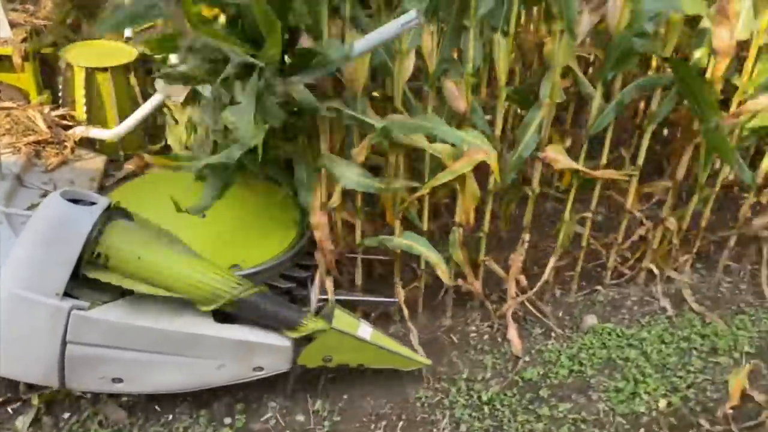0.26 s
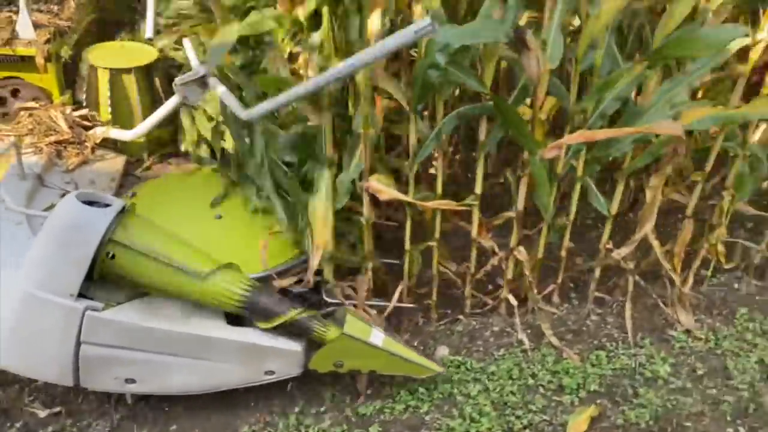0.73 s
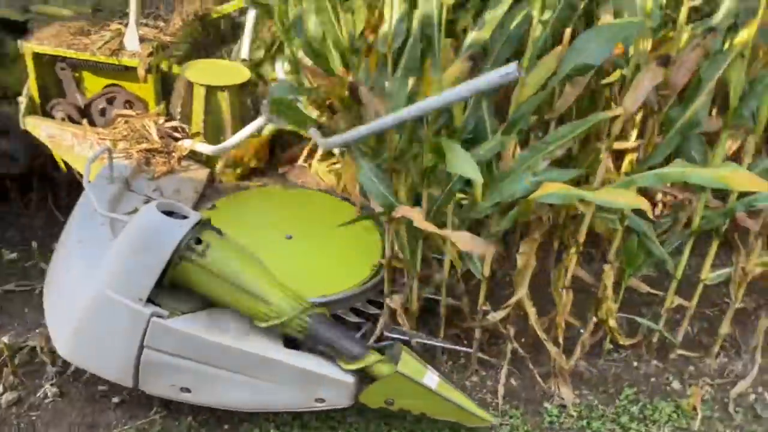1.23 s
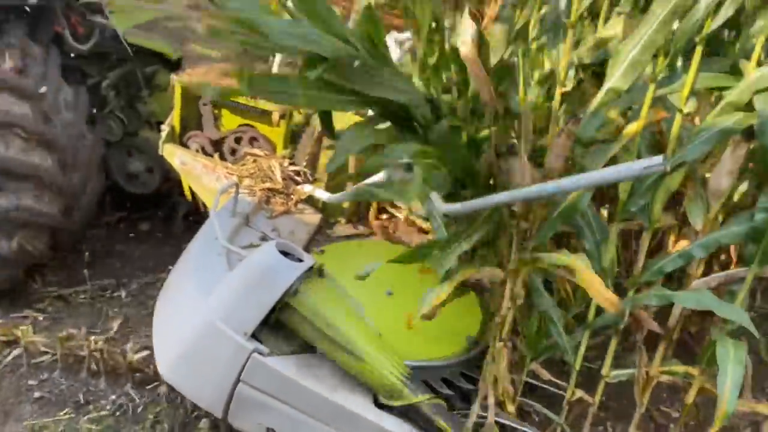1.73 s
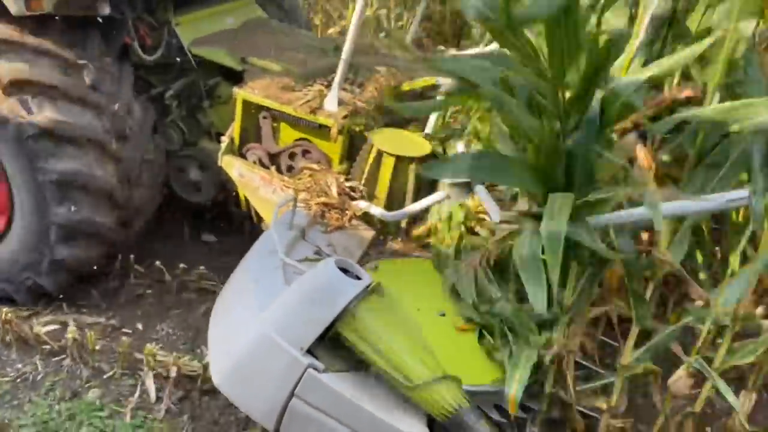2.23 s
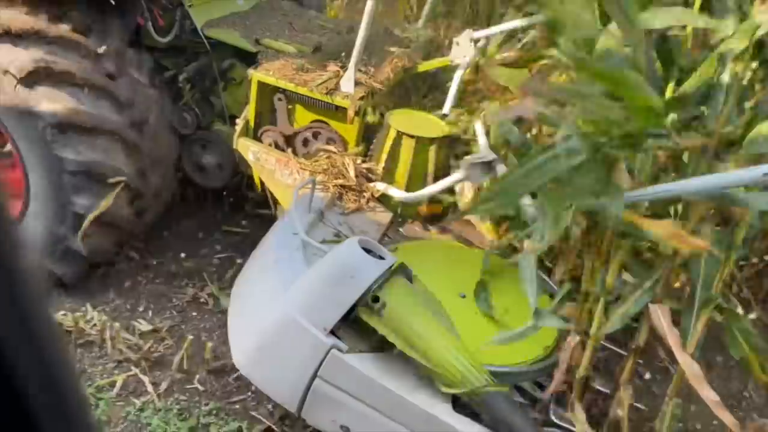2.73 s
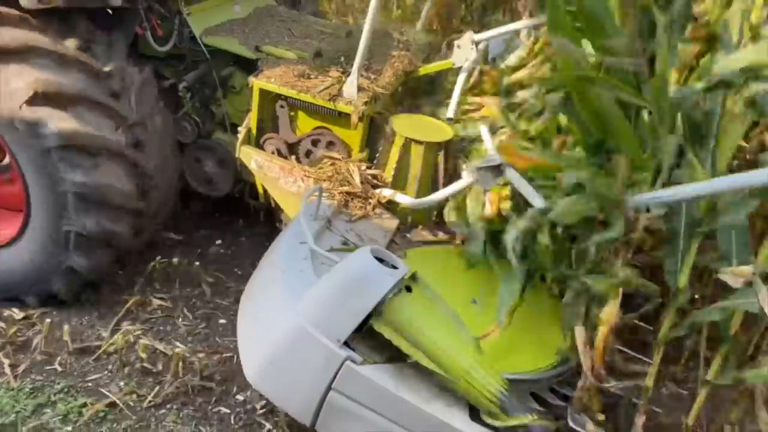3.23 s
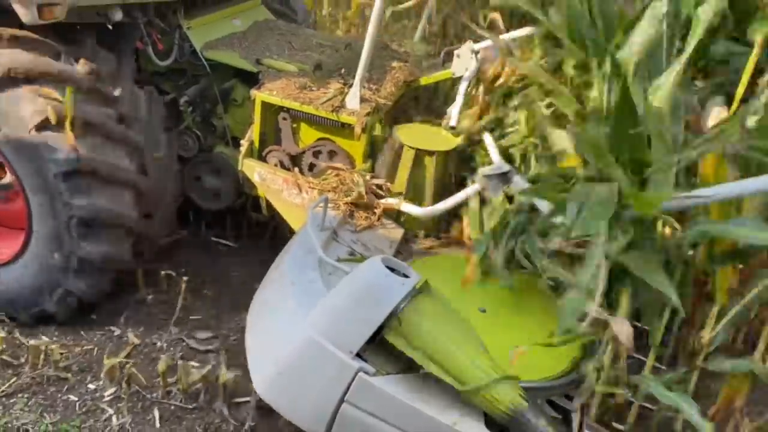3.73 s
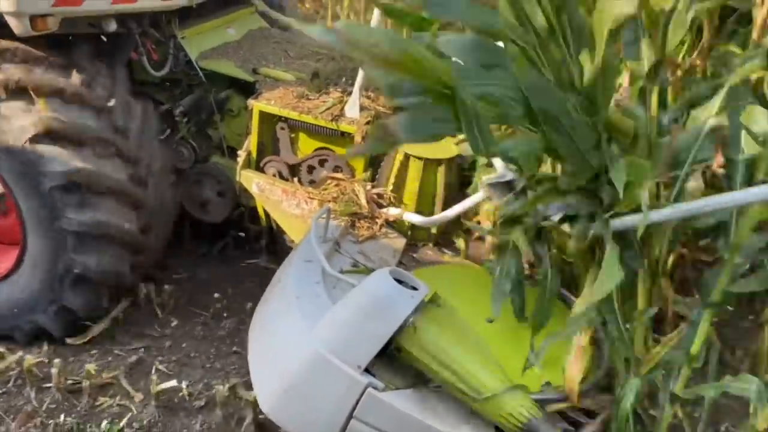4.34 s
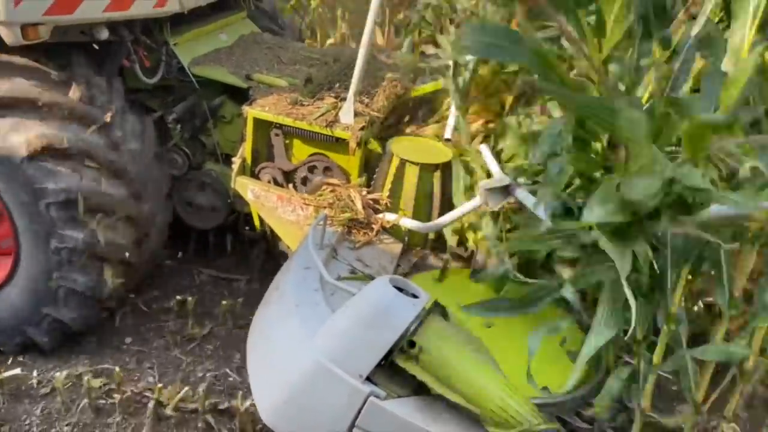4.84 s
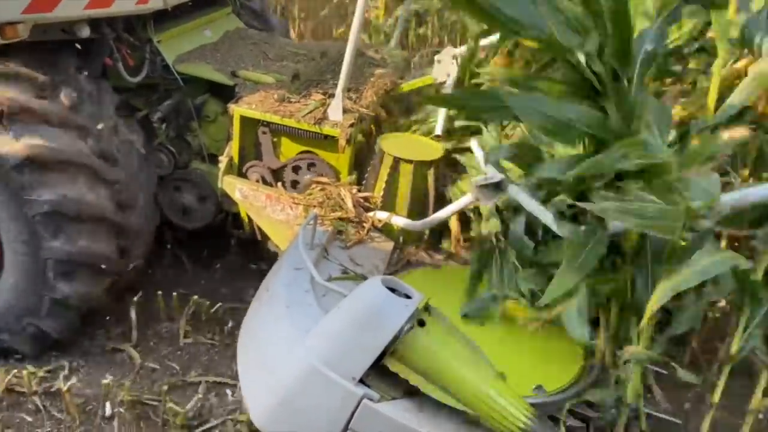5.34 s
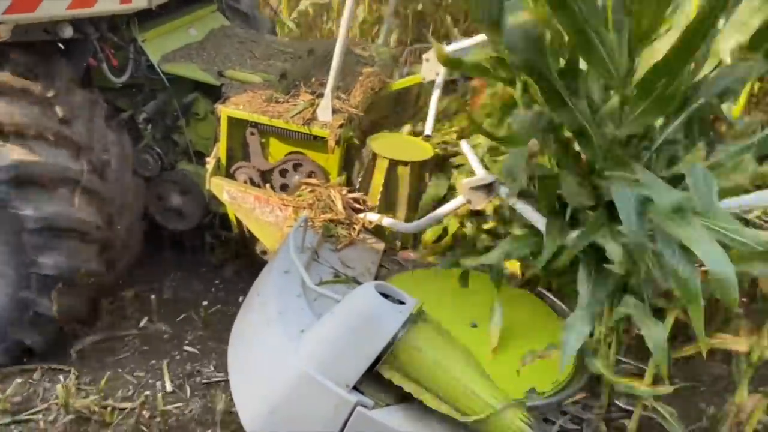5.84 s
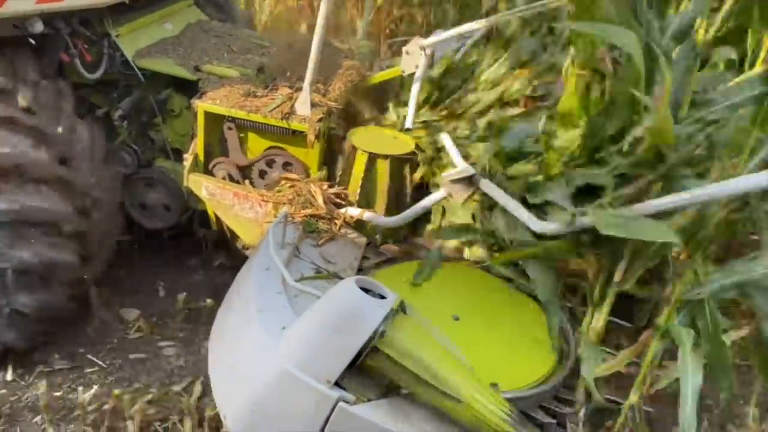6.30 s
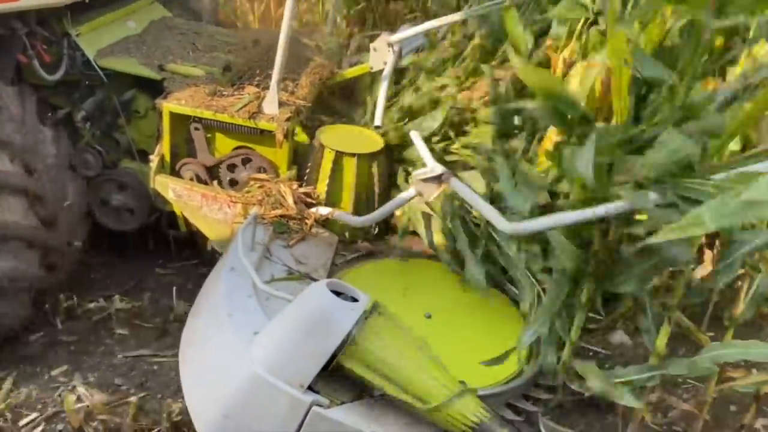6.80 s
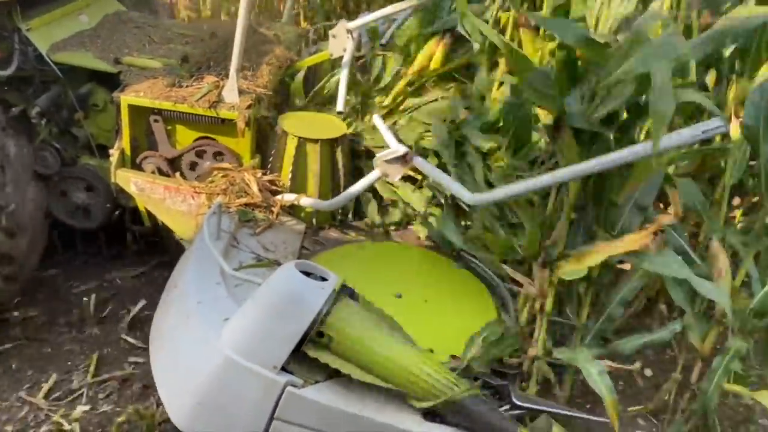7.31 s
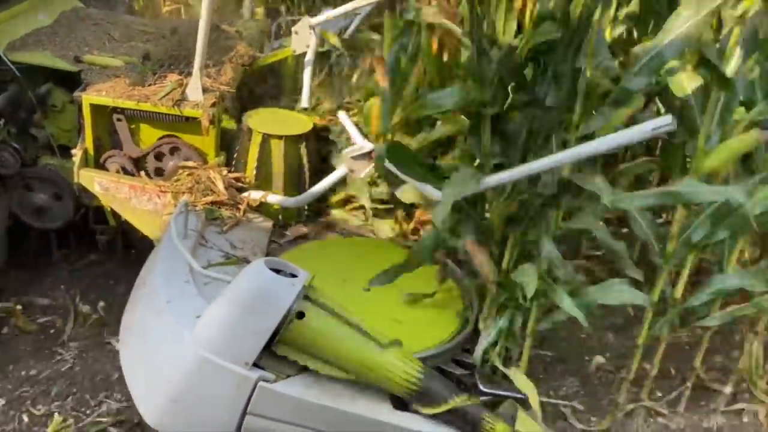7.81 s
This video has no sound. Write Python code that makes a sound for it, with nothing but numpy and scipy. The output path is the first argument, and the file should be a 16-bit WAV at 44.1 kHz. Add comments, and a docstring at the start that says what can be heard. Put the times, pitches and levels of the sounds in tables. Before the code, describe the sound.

Continuous harvester noise heard in stereo from a vehicle alongside: deep engine throb, rough harmonic drum hum, broad body roar and gritty hiss of chopped corn. Leaves tear and rustle, fine snaps crackle everywhere, and larger cobs pop against sheet metal. Engine speed climbs gently from about two seconds. The drum races briefly twice, with a cluster of crunches near 5.6 seconds, then drones lower to the end.

```python
"""In a standing corn field, heard from a tractor driving alongside a forage harvester, by a microphone pair.
From the start the knife drum and six-cylinder engine drone as harmonics; shaped noise is roar, chop and hiss.
Leaves rustle, stalks splinter and cobs crack as short ringing bursts; bunches crunch in the feed rollers.
From about 2 s the engine gains speed; near 3.6 and 5.4 s the drum races briefly, then runs slower from 6 s."""
import sys
import numpy as np
from scipy import signal
from scipy.fft import rfft, irfft, next_fast_len
from scipy.io import wavfile
from scipy.ndimage import uniform_filter1d, map_coordinates

SR = 44100
rng = np.random.default_rng(int(sys.argv[2]) if len(sys.argv) > 2 else 0)


def pcm_store(signal):
    """Save signal as 16-bit PCM."""
    levels = np.round(np.clip(np.atleast_2d(signal), -1, 1) * 32767)
    wavfile.write(sys.argv[1], SR, levels.astype(np.int16).T)


N = 355443


def amp(db):
    """Decibels to gain."""
    return 10 ** (np.asarray(db) / 20)


def unit(x):
    """Scale to rms 1."""
    return x / np.sqrt(np.mean(x ** 2) + 1e-20)


def along(points, hz):
    """Read (frequency, value) points on a log frequency axis."""
    f, v = np.transpose(points)
    return np.interp(np.log(hz + 1), np.log(f + 1), v)


def curves(rows):
    """One value per sample for each column after the time."""
    s, *cols = np.transpose(rows)
    return [np.interp(np.arange(N) / SR, s, c) for c in cols]


def wobble(rate):
    """A smooth random curve through `rate` knots a second."""
    knots = rng.standard_normal(4096)
    return map_coordinates(knots, [np.arange(N) * rate / SR], mode="wrap")


def hump(x, centre, width):
    """A bell-shaped band, 1 at its centre; width is its standard deviation."""
    return np.exp(-.5 * ((x - centre) / width) ** 2)


def filtered(x, response):
    """Multiply the spectrum of x by a response of frequency."""
    m = next_fast_len(N + SR // 2)
    return irfft(rfft(x, m) * response(np.fft.rfftfreq(m, 1 / SR)), m)[..., :N]


def panned(x, left_db):
    """Make the left microphone louder than the right by left_db."""
    return x * amp(np.array([[left_db], [-left_db]]) / 2)


def patchy(depth_db):
    """Two noises with shared patches of random gain in time and frequency."""
    z = signal.stft(rng.standard_normal((2, N)), nperseg=512)[2]
    field = rng.standard_normal(z.shape[1:])
    field = uniform_filter1d(field, size=4, axis=0)
    field = uniform_filter1d(field, size=8, axis=1)
    return signal.istft(z * amp(depth_db * unit(field)), nperseg=512)[1][:, :N]


def snaps(per_second, scatter_db, life):
    """Tiny fractures at random times, each a noise burst whose power decays over `life` seconds."""
    hit = rng.random(N) < per_second / SR
    size = amp(scatter_db * np.clip(rng.standard_normal(N), -2, 2))
    power = signal.lfilter([1], [1, -np.exp(-1 / (abs(life) * SR))], hit * size ** 2)
    return unit(np.sqrt(np.abs(power)) * rng.standard_normal((2, N)))


def tone(angle, db, flutter_db, flutter_rate):
    """One harmonic whose strength flutters; it dips further than it swells."""
    swell = unit(amp(flutter_db * np.minimum(wobble(flutter_rate), 1)))
    return np.sqrt(2) * amp(db) * swell * np.sin(angle + 2 * np.pi * rng.random())


# likeness of a wide source at the microphone pair: (frequency [Hz], left-right correlation [0-1])
PAIR_LIKENESS = [(60, .99), (300, .97), (700, .75), (1100, .62), (1600, .3), (2300, .25), (2900, .4),
                 (3600, .3), (4500, .55), (6500, .7), (9000, .9), (15000, .85)]


def spread(pair, spectrum):
    """Colour two unrelated signals and mix them as a wide source reaches the microphone pair."""
    def mix(hz):
        turn = np.arccos(np.clip(along(PAIR_LIKENESS, hz), -1, 1)) / 2
        return amp(along(spectrum, hz)) * np.array([np.cos(turn), np.sin(turn)])
    mid, side = filtered(pair, mix)
    return unit(np.array([mid + side, mid - side]))


# the harvester's flank draws level with the microphones, then moves off: (time [s], level [dB])
FLANK_VIEW = [(0, -1), (1.85, 0), (2.4, 1.05), (3.3, 0.5), (5.2, 1.5), (6, 0), (8.06, -1)]


def flank_level():
    """How openly the microphones face the harvester's flank, in dB."""
    return curves(FLANK_VIEW)[0]


# thick wads of crop that load the drum: (start [s], time at full load [s], load [0-1])
CROP_WADS = [(.3, 0.087, 0.06), (1.95, 0.078, 0.37), (3.45, 0.26, 0.5), (4.249, 0.35, 0.6),
             (5.25, 0.21, 0.8), (6.45, 0.16, 0.6)]


def wad_load():
    """Load on the drum: each wad is drawn in, holds and clears."""
    t = np.arange(N) / SR
    attack_s, release_s = 0.047, 0.71
    load = np.zeros(N)
    for start, hold, peak in CROP_WADS:
        corners = start + np.cumsum([0, attack_s, hold, release_s])
        load += peak * np.interp(t, corners, [0, 1, 1, 0])
    return load


# flow of crop into the header: (time [s], level of its leaf rustle [dB], used relative to its mean)
HEADER_FLOW = [(0, -43), (2.3, -45.5), (3.3, -45.5), (4.05, -44), (4.8, -46), (5.1, -44), (6.1, -45.5),
               (7.1, -47), (7.7, -44.5), (8.06, -46.5)]


def crop_db(average_db, per_flow_db, load_db):
    """Level of a crop noise: average, dB per dB of flow, and dB added at full drum load."""
    flow_db = curves(HEADER_FLOW)[0]
    return average_db + per_flow_db * (flow_db - flow_db.mean()) + load_db * wad_load()


def feed_surge():
    """Bunches of stalks pass through all stages, several a second."""
    return unit(filtered(wobble(34), lambda hz: hz / (hz + 6)))


# mean speed of the knife drum: (time [s], knife cuts per second [Hz])
KNIFE_SPEED = [(0, 186.0), (0.28, 186.3), (0.65, 188.5), (1, 185.7), (1.9, 188.1), (2.25, 186.0),
               (2.6, 187.2), (3.2, 187.6), (3.65, 191.7), (4.05, 188.1), (4.6, 185.3), (4.95, 185.3),
               (5.25, 190.3), (5.48, 190.7), (5.7, 186.2), (5.98, 182.8), (6.3, 184.3), (6.78, 181.5),
               (7.05, 184.6), (8.06, 184.5)]


def drum_angle():
    """Phase of the knife passes; uneven crop makes the drum waver."""
    cuts = curves(KNIFE_SPEED)[0] + .55 * wobble(25)
    return 2 * np.pi * np.cumsum(cuts) / SR + .03 * wobble(90)


# main harmonics, before panning: (multiple of cut rate, level at cruise [dB],
# change per extra cut a second [dB], change at full load [dB], change per dB of flank view [dB])
MAIN_HARMONICS = [(1, -30, 0, 0, 0.5), (4, -36.5, 0.75, 8.5, -2.5), (5, -32.5, 1.5, -1, 0),
                  (6, -36.5, .5, -10.5, 4.5)]
# roughness from uneven cuts, in the same order: (phase blur [rad], flutter [dB],
# flutter knots per second [Hz], gain of the sidebands)
MAIN_ROUGHNESS = [(0, 2.5, 8, .3), (.2, 4, 24, 1.1), (.15, 3.5, 28, 1), (.2, 4, 24, .9)]
# lines from ten unequal knives and a slower feed pulse: (offset [multiples of cut rate], level [dB])
KNIFE_SIDEBANDS = [(-.1, -14), (-.039, -14), (.039, -9), (.1, -10)]
# second harmonic, the drum's hum, before panning: (time [s], level [dB])
HUM_LEVEL = [(0, -23), (.33, -28.5), (.5, -19.5), (.8, -29), (1.05, -23), (1.48, -31), (1.72, -25.5),
             (2.55, -24), (2.75, -28.5), (3.05, -23), (3.48, -25), (3.68, -19.5), (4.15, -23.5), (4.5, -22),
             (5.2, -25), (5.56, -17), (5.88, -17.3), (6.03, -22.5), (6.27, -20.5), (6.45, -25.5),
             (6.78, -20.3), (7.05, -25), (7.55, -23.5), (7.7, -28), (8.06, -23.5)]
# third harmonic, before panning: (time [s], level [dB])
THIRD_LEVEL = [(0, -28), (.3, -31), (1, -28.5), (1.5, -30.5), (1.85, -27), (2.3, -30), (2.8, -28),
               (3.2, -31), (3.65, -26), (4.1, -26.5), (4.5, -23.5), (4.95, -25), (5.2, -31), (5.37, -22),
               (5.52, -27), (5.65, -25), (5.82, -29), (6, -23.5), (6.5, -28), (7.1, -24.5), (7.7, -28),
               (8.06, -27)]
# steady harmonics, before panning: (multiple of cut rate, level [dB])
STEADY_HARMONICS = [(7, -44.5), (8, -46), (10, -61.5), (12, -52)]


def drum(angle):
    """Knives pass the shear bar; speed, load and the view of the flank set the harmonics."""
    cruise_cuts_per_s = 187
    overspeed = curves(KNIFE_SPEED)[0] - cruise_cuts_per_s
    load, flank = wad_load(), flank_level()
    tones = []
    for harmonic, roughness in zip(MAIN_HARMONICS, MAIN_ROUGHNESS):
        k, db, speed_db, load_db, flank_share = harmonic
        blur, flutter_db, flutter_rate, stutter = roughness
        phase = k * angle + blur * wobble(2 * flutter_rate)
        level_db = db + speed_db * overspeed + load_db * load + flank_share * flank
        level_db += 1.3 * np.minimum(wobble(7), 1)  # each harmonic swells and fades on its own
        sides = np.zeros(N)
        for offset, side_db in KNIFE_SIDEBANDS:
            sides += amp(side_db) * np.sin(phase + offset * angle + 2 * np.pi * rng.random())
        line = tone(phase, level_db, flutter_db, flutter_rate)
        tones.append(line + stutter * np.sqrt(2) * amp(level_db) * sides)
    # the fundamental lies close to the engine's third firing harmonic, and the two beat
    first, *upper = tones
    second = tone(2 * angle, curves(HUM_LEVEL)[0], flutter_db=2.2, flutter_rate=18)
    third_phase = 3 * angle + .2 * wobble(24)
    third = tone(third_phase, curves(THIRD_LEVEL)[0], flutter_db=4.5, flutter_rate=22)
    high = third + sum(upper)
    for k, db in STEADY_HARMONICS:
        high += tone(k * angle + 0.33 * wobble(60), db, flutter_db=6.0, flutter_rate=18)
    return panned(first + second, left_db=-2.5) + panned(high, left_db=2.5)


# mean engine speed: (time [s], firings per second [Hz])
FIRING_RATE = [(0, 59.9), (.25, 60.2), (.75, 59.3), (1.6, 59.5), (1.85, 60.1), (2.1, 61.7), (2.4, 62.6),
               (2.8, 63.4), (3.8, 64.4), (4.4, 64.55), (5.25, 64.9), (5.6, 65.9), (5.9, 66.2), (6.4, 65.55),
               (8.06, 65.5)]
# engine orders, before exhaust lift, overall gain and panning:
# (multiple of the six-firing cycle, level [dB], change while lugging [dB])
CYCLE_ORDERS = [(6, -31.7, -1), (9, -38, -2), (12, -31.3, -2), (15, -38.5, -5), (16, -35, -5),
                (17, -34, -4.5), (18, -30, 0), (19, -33.5, 2), (20, -33.5, -2.5), (21, -33.5, -6),
                (22, -37, -7), (23, -40, 3), (24, -30.5, -6), (26, -45, 10), (32, -35.5, -10), (38, -42, 0)]
# mean throb of the strongest cylinder: (time [s], level added to its orders [dB])
THROB_LEVEL = [(0, .5), (.3, -2), (.55, -1.5), (.74, 2.8), (1, 1), (1.2, -2), (1.55, 2.2), (1.72, .3),
               (1.95, 1.8), (2.2, -1.5), (3, .3), (5.2, .3), (5.6, -1), (6.2, 0), (8.06, .5)]


def engine():
    """Six unequal cylinders give lines at cycle multiples; the strongest thumps the exhaust each cycle."""
    cylinders, strong_firing_s, throb_orders = 6, .05, (17, 18, 19)
    exhaust_hz, exhaust_width_hz, exhaust_lift_db = 180, 6.5, 7
    firings = curves(FIRING_RATE)[0] + 0.11 * wobble(6)
    cycle_hz = firings / cylinders
    cycle = 2 * np.pi * (np.cumsum(cycle_hz) / SR - strong_firing_s * cycle_hz[0])
    lugging = np.interp(firings, (60.5, 62), [1, 0])  # fades out between these firing rates
    throb_db = curves(THROB_LEVEL)[0] + .6 * wobble(14)
    hum = np.zeros(N)
    for k, db, lug_db in CYCLE_ORDERS:
        # the exhaust's resonance lifts each order passing through
        lift_db = exhaust_lift_db * hump(k * cycle_hz, exhaust_hz, exhaust_width_hz)
        level_db = db + lug_db * lugging + lift_db
        if k in throb_orders:
            hum += np.sqrt(2) * amp(level_db + throb_db) * np.cos(k * cycle)
        else:
            hum += tone(k * cycle, level_db, flutter_db=1.5, flutter_rate=5.8)
    return panned(amp(.4) * hum, left_db=-2.0)


# machine body: (frequency [Hz], relative level per Hz [dB])
ROAR_SPECTRUM = [(25, -30), (42, -16.5), (58, -16), (76, -0.5), (100, -2), (150, -2), (200, -1.5), (232, 0),
                 (270, -2), (310, -1), (420, -1), (640, -8), (830, -10), (1000, -11), (1300, -16.5),
                 (2000, -23.5), (4000, -62)]


def roar():
    """The feed makes the machine body roar: low patchy noise that throbs with the uneven feed."""
    level_db = crop_db(average_db=-20.5, per_flow_db=-0.067, load_db=0.77)
    level_db += 0.42 * flank_level() + .7 * wobble(17)
    return panned(amp(level_db) * spread(patchy(depth_db=1.23), ROAR_SPECTRUM), left_db=-4.5)


# chopping noise: (frequency [Hz], relative level per Hz [dB])
CHOP_SPECTRUM = [(400, -37), (700, -2), (1000, 2), (1240, -6.5), (1480, -1), (1720, -14), (1950, -5),
                 (2600, -10), (3500, -23), (8000, -39)]


def chop(angle, surge):
    """Noise that swells at every knife cut."""
    cuts = amp(2.9 * np.cos(angle))
    level_db = crop_db(average_db=-32.5, per_flow_db=0.75, load_db=0.7) + 1.3 * surge
    return panned(amp(level_db) * spread(cuts * patchy(depth_db=1.0), CHOP_SPECTRUM), left_db=2.5)


# hiss of the spout: (frequency [Hz], relative level per Hz [dB])
SPOUT_SPECTRUM = [(1200, -58), (2400, -1.5), (3200, -0.5), (4200, -1), (5700, -5.5), (6400, -5),
                  (8000, -17.5), (12000, -49)]
# treble of the spout: (time [s], gain at the band's centre [dB])
SPOUT_TREBLE = [(0, -5), (.92, -2.5), (1.3, 0.5), (1.9, 1.5), (2.6, 0.2), (3.5, 1), (4, 1), (4.9, -1),
                (5.5, 1.5), (6, -0.5), (8.06, 1.5)]


def spout(surge):
    """Chopped crop hisses through the spout as noise and short snaps, with a changing treble."""
    stalks = patchy(depth_db=1.8) + .5 * snaps(per_second=260, scatter_db=3, life=.0025)
    level_db = crop_db(average_db=-35.5, per_flow_db=0.43, load_db=0.49) + 0.44 * surge
    hiss = amp(level_db) * spread(stalks, SPOUT_SPECTRUM)
    treble = filtered(hiss, lambda hz: hump(hz, 4600, 700))
    hiss += (amp(curves(SPOUT_TREBLE)[0]) - 1) * treble
    return panned(hiss, left_db=2.0)


# tearing leaves: (frequency [Hz], relative level per Hz [dB])
LEAF_SPECTRUM = [(4500, -20), (6500, -8), (7200, -1.5), (8700, 0), (10700, 0), (11300, -5), (12200, -14),
                 (13000, -18), (15800, -18)]


def leaves(surge):
    """Tearing leaves rustle in the header: smooth noise with a grain of snaps."""
    shreds = patchy(depth_db=2.5) + 0.68 * snaps(per_second=530, scatter_db=3.5, life=0.0025)
    level_db = crop_db(average_db=-37.5, per_flow_db=0.93, load_db=.1) + 1.0 * surge
    return amp(level_db) * spread(shreds, LEAF_SPECTRUM)


def crop(angle):
    """Roar, chopping, spout hiss and leaf rustle, the last three sharing the surges of the feed."""
    surge = feed_surge()
    return roar() + chop(angle, surge) + spout(surge) + leaves(surge)


def splinters():
    """Stalks splinter in clumps; each snap has its own pitch, life, size and side."""
    per_second, low_hz, high_hz = 750, 1750, 6000
    range_db, middle_t60_s, rise_s = 12, .035, 0.0022
    clumps = unit(amp(4 * np.minimum(wobble(14), 1)))
    starts = np.flatnonzero(rng.random(N) < clumps * per_second / SR)
    pitch, life, size, side, phase = rng.random((len(starts), 5)).T[..., None]
    t = np.arange(SR // 20) / SR
    angle = 2 * np.pi * low_hz * (high_hz / low_hz) ** pitch * t
    t60 = middle_t60_s * 2 ** (2 * life - 1)
    decay = (1 - np.exp(-t / rise_s)) * amp(-range_db * size - 5 * pitch - 60 * t / t60)
    left = np.sqrt(side) * np.sin(angle)
    right = np.sqrt(1 - side) * np.sin(angle + np.pi * (phase - .5))
    where = (starts[:, None] + np.arange(len(t))).ravel()
    pair = np.array([np.bincount(where, (decay * p).ravel(), N)[:N] for p in (left, right)])
    return amp(crop_db(average_db=-38.5, per_flow_db=.4, load_db=1)) * unit(pair)


# resonances of the header's sheet-metal panels: (frequency [Hz], lift [dB])
PANEL_RESONANCES = [(1860, 2), (2260, 1.5), (2800, 2.5), (3170, 3), (3850, 1.5), (4200, 2.5), (4730, 1),
                    (5250, 3), (5880, 3.5)]


def sheet_metal(x):
    """The header's panels lift narrow bands of the crop noises and splinters."""
    def lift(hz):
        return amp(sum(db * hump(hz, centre, 85) for centre, db in PANEL_RESONANCES))
    return filtered(x, lift)


def whine():
    """A faint, thin whistle from the running machinery."""
    hz = 10640 + 16 * wobble(30)
    return tone(2 * np.pi * np.cumsum(hz) / SR, -57.5, flutter_db=4, flutter_rate=5)


# bunches of stalks crushed in the feed rollers:
# (time of middle [s], bell width in time [s], level [dB], pitch [Hz], bell width in pitch [Hz])
ROLLER_CRUNCHES = [(.55, .4, -42, 3150, 150), (1.33, .07, -38.5, 4200, 220), (1.65, .15, -42, 4400, 450),
                   (5.25, .06, -41, 4000, 800), (5.54, .04, -39, 4300, 1100),
                   (5.66, .04, -34.5, 3600, 1400), (6.66, .04, -40, 2300, 900)]


def crunches():
    """A bunch of stalks is crushed: a swell of dense crackle."""
    t = np.arange(N) / SR
    grit = snaps(per_second=500, scatter_db=3, life=.003)
    out = np.zeros((2, N))
    for s, spread_s, db, hz, width_hz in ROLLER_CRUNCHES:
        crackle = unit(filtered(grit, lambda f: hump(f, hz, width_hz)))
        out += amp(db) * hump(t, s, spread_s) * crackle
    return out


# cobs and thick stalks cracking in the header:
# (time [s], peak level [dB], pitch [Hz], time for the burst to fall 60 dB [s])
COB_CRACKS = [(0.135, -27, 3000, 0.22), (0.5282, -27, 1960, .06), (.69, -26, 2300, .12),
              (1.01, -23, 2280, .12), (1.11, -27, 3200, .14), (1.751, -22, 1600, .12),
              (2.0962, -17, 2060, 0.11), (2.34, -25, 5850, .16), (2.3702, -24, 1570, .12),
              (2.645, -26, 7100, 0.17), (3.7963, -29, 1560, .07), (4.3007, -27, 1970, .07),
              (4.7847, -25, 1960, .07), (5.1934, -25, 3940, .12), (5.57, -26, 4100, .16),
              (5.621, -26, 2870, 0.24), (5.6561, -21, 2000, .09), (6.6229, -21, 1560, 0.13),
              (7.0762, -25, 2200, .08)]


def cobs():
    """Each crack is a short burst ringing in the header's sheet metal."""
    t = np.arange(SR // 5) / SR
    out = np.zeros((2, N + len(t)))
    for s, db, hz, t60 in COB_CRACKS:
        burst = rng.standard_normal((2, len(t))) * amp(-60 * t / t60)
        panel = signal.iirpeak(hz, 8, SR)
        crack = signal.lfilter(*panel, signal.lfilter(*panel, burst))
        start = round(s * SR)
        out[:, start:start + len(t)] += amp(db) * crack / np.abs(crack).max()
    return out[:, :N]


# phase between the microphones, before the treble lag: (frequency [Hz], lead of the left [rad])
LEFT_LEAD = [(50, 0), (200, .1), (450, .35), (700, .4), (1150, .9), (1400, 2), (1850, -1), (2400, 0),
             (2900, 2.2), (3800, 0)]


def scene():
    """All sources, with the phase shifts between the two microphone ports."""
    angle = drum_angle()
    sound = drum(angle) + engine() + sheet_metal(crop(angle) + splinters())
    sound += whine() + cobs() + crunches()
    # the highest rustle comes from the header on the right, so this treble reaches the left port late
    port_lag_s, lag_from_hz = .00027, 6550

    def port_phase(hz):
        lead = along(LEFT_LEAD, hz) - 2 * np.pi * port_lag_s * np.maximum(hz - lag_from_hz, 0)
        return np.exp(.5j * np.array([[1], [-1]]) * lead)
    return filtered(sound, port_phase)


def record(dry):
    """The recorder rounds off the rare highest peaks and keeps nothing above its band limit."""
    top_hz = 15800
    rounded = dry / (1 + np.abs(dry / .92) ** 8) ** (1 / 8)
    return filtered(rounded, lambda hz: hz < top_hz)


dry = scene()
out = record(dry)
pcm_store(out)
```